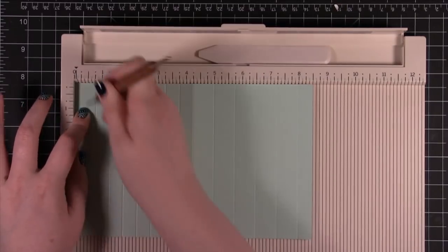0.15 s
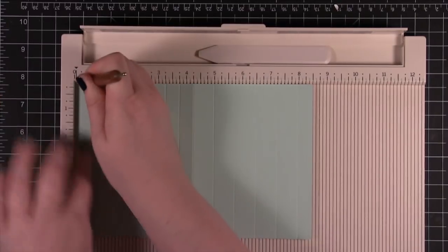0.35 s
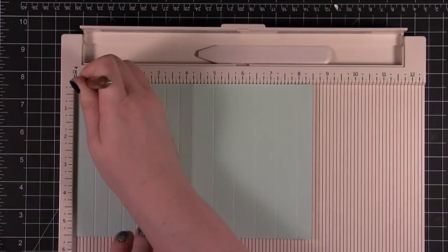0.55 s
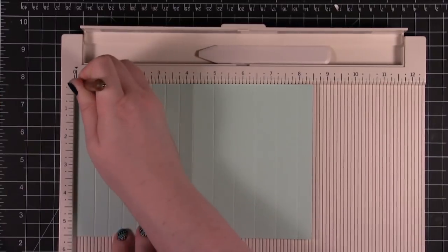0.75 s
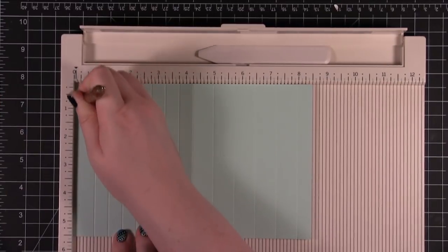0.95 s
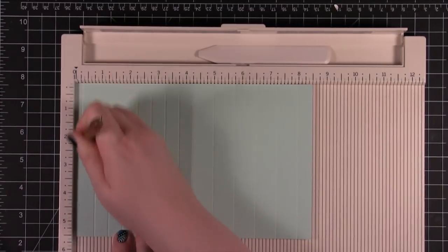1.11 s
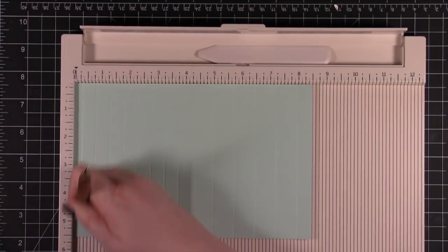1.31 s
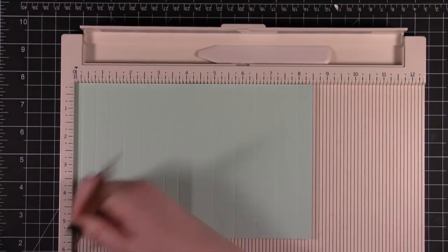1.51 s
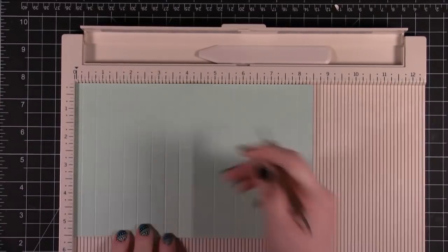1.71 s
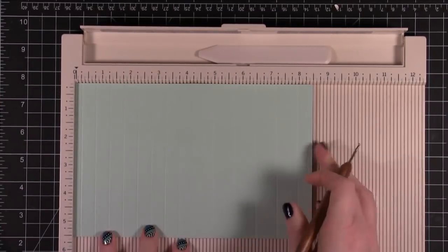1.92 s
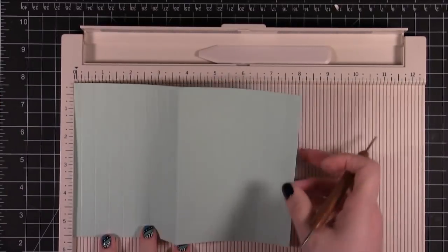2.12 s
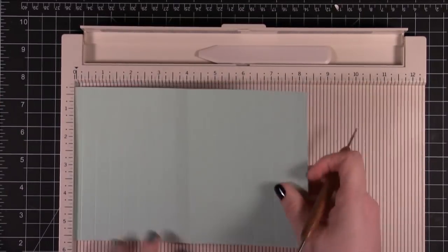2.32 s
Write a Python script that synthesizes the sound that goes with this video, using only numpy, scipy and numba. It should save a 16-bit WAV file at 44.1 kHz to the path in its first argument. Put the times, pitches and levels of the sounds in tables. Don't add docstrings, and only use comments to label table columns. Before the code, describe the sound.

A stylus scrapes a groove in card on a hollow plastic board, ending in a sharp clack

```python
import sys
import numpy as np
from scipy import signal
from scipy.fft import rfft, irfft, next_fast_len
from scipy.io import wavfile
from scipy.ndimage import uniform_filter1d
from numba import njit

SR = 44100
rng = np.random.default_rng(int(sys.argv[2]) if len(sys.argv) > 2 else 0)


def put_to_file(sound):
    columns = np.atleast_2d(sound).T
    safe = np.clip(columns, -1, 1)
    whole_steps = np.round(safe * 32767)
    wavfile.write(sys.argv[1], SR, whole_steps.astype(np.int16))


def attenuation_scalar(level_db):
    decades = np.asarray(level_db, float) / 20
    return 10 ** decades


N = 103811

# pitch_hz, level_db, t60_s
BOARD_MODES = [(239, -8, 0.12), (402, -20, 0.24), (479, 7.5, 0.061), (532, 8, 0.06), (770, 10, 0.047),
               (1013, 6, 0.061), (1267, 7.5, 0.056), (1380, -1, 0.082), (1758, -7, 0.32), (2200, -5, 0.057),
               (2476, -26, 0.054), (3080, -15, 0.04), (3840, -24, 0.035), (4900, -10, .04)]
# pitch_hz, level_db, t60_s
CARD_MODES = [(357, -5, 0.14), (544, 4.5, 0.092), (681, -12, 0.032), (850, -10, 0.087), (990, 9.5, 0.11),
              (1190, 14.5, 0.07), (1290, 19, 0.032), (1438, 12, 0.11), (1685, 7, 0.11), (1988, 13, 0.1),
              (2420, -13, 0.069), (2690, 0, 0.072), (3450, -12, .03)]
BOARD_LOW_HZ, CARD_LOW_HZ = 245, 435


def unit(x):
    return x / np.sqrt(np.mean(x ** 2))


def colour(x, points):
    hz, db = np.array(points, float).T
    n = next_fast_len(N)
    bin_hz = np.arange(n // 2 + 1) * SR / n
    gain = attenuation_scalar(np.interp(np.log(bin_hz + 1), np.log(hz), db))
    return unit(irfft(rfft(x, n) * gain, n)[:N])


def ring(x, modes):
    out = 0
    for hz, db, t60_s in modes:
        pole = np.exp(2j * np.pi * hz / SR - np.log(1000) / (max(t60_s, .002) * SR))
        out = out + attenuation_scalar(db) * signal.lfilter([1], [1, -pole], x).imag
    return out


def cut(x, hz, kind, order=2):
    sos = signal.butter(order, np.clip(hz, 20, .45 * SR), kind, fs=SR, output="sos")
    return signal.sosfilt(sos, x)


def wander(hz):
    return unit(cut(rng.standard_normal(N), hz, "low"))


def grit(rate_hz, spread_db):
    clicks = (rng.random(N) < rate_hz / SR) * attenuation_scalar(spread_db * np.minimum(rng.exponential(size=N), 3))
    flicker = attenuation_scalar(0.5 * wander(60))
    return unit(rng.standard_normal(N) * (1 + 0.5 * clicks) * flicker)


@njit
def sweep(x, hz, sharp):
    y, b, l = np.empty(len(x)), 0., 0.
    for i in range(len(x)):
        g = np.tan(np.pi * hz[i] / SR)
        v = (b + g * (x[i] - l)) / (1 + g * (g + sharp))
        b, l, y[i] = 2 * v - b, l + 2 * g * v, sharp * v
    return y


def pan(x, db):
    return x * attenuation_scalar(np.array([[db], [-db]]) / 2)


def stylus(t):
    # time_s, fibre_hiss_db, board_push_db
    stroke = [
        (.88, -83, -74),
        (1.0, -51.5, -50),
        (1.1, -45.5, -61),
        (1.2, -39.5, -35),
        (1.27, -38.5, -37),
        (1.31, -37.5, -30.5),
        (1.36, -40, -27),
        (1.41, -38.5, -39.5),
        (1.428, -50, -48),
    ]
    # pitch_hz, level_db (per Hz)
    fibre = [(80, -40), (400, -6), (1200, -9.5), (1770, -11), (2560, -12.5), (8440, -13), (14500, -21),
             (16000, -27)]
    # pitch_hz, pass_s, lively_s
    passed = [(124, 1.22, .06), (235, 1.125, .02), (245, 1.21, .03), (240, 1.305, .02), (229, 1.385, .045),
              (360, 1.335, .02), (390, 1.38, .02), (455, 1.235, .04), (475, 1.315, .025), (560, 1.12, .015),
              (570, 1.17, .02), (575, 1.3, .02), (690, 1.29, .02), (770, 1.245, .03), (780, 1.35, .025),
              (880, 1.23, .02), (1020, 1.13, .03), (1010, 1.29, .035), (975, 1.34, .018), (1060, 1.38, .02),
              (1120, 1.32, .015), (1245, 1.15, .03), (1310, 1.27, .025), (1500, 1.23, .025),
              (1740, 1.3, .04)]
    passed_db = [-55, -49.5, -53, -56, -43.5, -44, -44, -43, -34.5, -53, -48.5, -39.5, -43.5, -45, -49, -47,
                 -53, -37.5, -41.5, -62, -43, -53, -49, -49, -47.5]
    pass_t60_s, pass_rest_db, pass_lock, lift_s = 0.15, -23, .85, .006
    s, hiss_db, push_db = np.array(stroke).T
    out = colour(grit(740, 5.0), fibre) * attenuation_scalar(np.interp(t, s, hiss_db))
    push = grit(420, 8.2)
    rest = attenuation_scalar(pass_rest_db + np.interp(t, s, push_db))
    for (hz, pass_s, lively_s), db in zip(passed, passed_db):
        mode = [(hz, 0, pass_t60_s)]
        loose = ring(push, mode)
        locked = cut(ring(loose, mode), hz / 2, "high")
        locked = unit(locked / uniform_filter1d(locked ** 2, size=1200) ** (pass_lock / 2))
        near = np.exp(-((t - pass_s) / lively_s) ** 2)
        out = out + unit(cut(loose, hz / 2, "high")) * rest + locked * attenuation_scalar(db) * near
    return out * (t > s[0]) * np.clip((s[-1] - t) / lift_s, 0, 1)


def hits(rows, modes, low_hz):
    # pitch_hz, level_db (per Hz)
    crack_tone = [(880, 7.5), (1500, 4), (2250, 1.5), (3590, -4), (4870, -5.5), (12100, -18), (16000, -31)]
    crack_t60_s, rattle_db, rattle_t60_s = 0.035, -28, 0.49
    contact_cycles, favour_db_per_oct = 0.52, 11
    spot_db, spot_t60_s = 8, .03
    held_t60_s = .06
    out, n = np.zeros(N), int(.22 * SR)
    t = np.arange(n) / SR
    crack = cut(colour(grit(2000, 1.1), crack_tone), low_hz, "high", order=4)
    fade = attenuation_scalar(-60 * t / crack_t60_s) + attenuation_scalar(rattle_db - 60 * t / rattle_t60_s)
    for s, db, favoured_hz, crack_db in rows:
        push = np.sin(np.pi * np.clip(t * favoured_hz / contact_cycles, 0, 1)) ** 2
        struck = [(favoured_hz, spot_db, spot_t60_s)]
        for hz, mode_db, t60_s in modes:
            luck = rng.standard_normal()
            off_db = favour_db_per_oct * abs(np.log2(hz / favoured_hz))
            struck.append((hz * (1 + luck / 100), mode_db + luck - off_db, min(t60_s, held_t60_s)))
        body = cut(ring(push, struck), low_hz, "high", order=4)
        body = body / np.abs(body).max()
        i = int(s * SR)
        k = min(n, N - i)
        out[i:i + k] += attenuation_scalar(db) * (body[:k] + attenuation_scalar(crack_db) * crack[i:i + k] * fade[:k])
    return out


def knocks():
    # start_s, level_db, favoured_hz, crack_db
    board_knocks = [(.2245, -30, 507, -43), (.2545, -36.5, 1210, 3.5), (.258, -32, 543, -45),
                    (.397, -44, 730, -5), (.4165, -33.5, 500, -45), (.43, -36, 440, -40),
                    (.445, -44, 386, -40), (.275, -46, 480, -40), (.305, -40.5, 490, -40),
                    (1.4241, -11.5, 770, -2.5), (1.4262, -9.5, 520, -7), (1.4305, -23, 750, 3.5),
                    (1.437, -43, 480, -16), (1.444, -23.5, 800, -6.5), (1.451, -25, 380, -20),
                    (1.459, -27, 480, -13), (1.466, -28.5, 750, -30), (1.476, -30, 450, -26),
                    (1.488, -28, 544, -28), (1.516, -38, 613, -19), (1.528, -43, 520, -22),
                    (1.677, -32.5, 1014, -47), (1.684, -37, 560, -40), (1.936, -45, 460, -24)]
    return hits(board_knocks, BOARD_MODES, BOARD_LOW_HZ)


def snaps():
    # start_s, level_db, favoured_hz, crack_db
    card_snaps = [(2.127, -49, 860, -30), (2.135, -31, 1500, -30), (2.15, -28, 1470, -33),
                  (2.151, -51, 536, -40), (2.16, -29, 1320, -20), (2.184, -27, 1370, -25),
                  (2.192, -28.5, 1210, -34), (2.197, -26, 980, -35), (2.203, -40, 1050, -35),
                  (2.222, -39, 1240, -30), (2.257, -24.5, 1510, -17), (2.2752, -16, 700, -19),
                  (2.279, -14.5, 776, -10), (2.2812, -4.5, 1290, -39), (2.2845, -6.5, 860, -38),
                  (2.2865, -20, 1860, -15), (2.289, -10.5, 1190, -23), (2.293, -12, 714, -35),
                  (2.2945, -17, 1300, -32), (2.2995, -32, 1110, -7), (2.304, -17, 900, -19),
                  (2.3095, -21, 1230, -14), (2.318, -32, 850, -22), (2.3222, -22.5, 1510, 0.5),
                  (2.3238, -13.5, 1240, -21), (2.328, -19, 1380, -14.5), (2.3395, -23.5, 1140, -11),
                  (2.347, -23, 1620, -13)]
    return hits(card_snaps, CARD_MODES, CARD_LOW_HZ)


def scrapes(t):
    # loudest_s, length_s, level_db,
    # early_edge_hz, late_edge_hz
    edge_scrapes = [(1.446, 0.0068, -31.5, 4500, 4870), (1.461, 0.0056, -35.5, 4900, 4200),
                    (1.482, 0.011, -44, 4200, 4000), (2.151, 0.002, -42, 3450, 3300),
                    (2.222, 0.0033, -52, 2670, 2770), (2.002, 0.016, -54, 540, 536),
                    (2.01, 0.025, -50, 1470, 2220), (2.031, 0.015, -47, 520, 560),
                    (2.038, 0.012, -43.5, 4030, 5660), (2.062, 0.051, -49, 2250, 1810),
                    (2.114, .015, -44, 5100, 6530), (2.132, 0.023, -48, 8600, 6300),
                    (2.136, 0.02, -46, 3250, 3450), (2.163, 0.0055, -38.5, 2970, 2530),
                    (2.155, 0.011, -53.5, 535, 544), (2.2, 0.016, -47, 1790, 1650),
                    (2.193, 0.015, -48, 1400, 1080), (2.214, 0.0065, -49, 1040, 1250),
                    (2.26, 0.012, -47.5, 7900, 7200), (2.263, 0.015, -44, 2760, 2530),
                    (2.339, 0.022, -44, 2740, 2840)]
    width, broad_db, card_db = 0.32, -2.5, -6
    out, rub = 0, grit(780, 5.7)
    damped = [(hz, db, t60_s * 0.43) for hz, db, t60_s in CARD_MODES]
    stir = unit(cut(ring(rub, damped), CARD_LOW_HZ, "high"))
    for k, (s, length_s, db, early_hz, late_hz) in enumerate(edge_scrapes):
        shift = k * N // len(edge_scrapes)
        x, card = np.roll(rub, shift), np.roll(stir, shift)
        env = np.exp(-((t - s) / length_s) ** 2 / 2)
        glide_hz = np.interp(t, [s - length_s, s + length_s], [early_hz, late_hz])
        edge = unit(sweep(sweep(x, glide_hz, width), glide_hz, width))
        broad = unit(cut(x, [late_hz / 2, 2 * late_hz], "band", order=1))
        out = out + attenuation_scalar(db) * env * (edge + attenuation_scalar(broad_db) * broad + attenuation_scalar(card_db) * card)
    return out


def fingers(t):
    # start_s, length_s, level_db, lowest_hiss_hz
    slides = [
        (-.05, 0.07, -42, 850),
        (-.05, 0.33, -43, 2900),
        (.24, 0.087, -52, 3910),
        (.08, .14, -43, 3070),
        (0.328, 0.089, -44.5, 4360),
        (0.481, 0.082, -46.5, 5600),
        (1.432, 0.0097, -52, 3840),
        (1.567, 0.0088, -56.5, 1500),
        (1.785, 0.11, -56.5, 2870),
        (1.873, 0.075, -65, 4950),
    ]
    attack_s, release_s, skin_top_hz = 0.0053, 0.034, 10700
    body_db, skin_peak_db = -14.5, -20
    damped = [(hz, db, t60_s * 0.8) for hz, db, t60_s in BOARD_MODES]
    board = unit(cut(ring(rng.standard_normal(N), damped), BOARD_LOW_HZ, "high"))
    rub = cut(grit(830, 2), skin_top_hz, "low", order=1) * attenuation_scalar(0.8 * wander(27))
    out = 0
    for k, (s, length_s, db, hz) in enumerate(slides):
        attack = np.clip((t - s) / attack_s, 0, 1)
        release = np.exp(-(np.maximum(t - s - length_s, 0) / release_s) ** 2)
        skin = unit(cut(np.roll(rub, k * N // len(slides)), hz, "high", order=3))
        skin = skin + attenuation_scalar(skin_peak_db) * unit(cut(skin, [hz, hz * 1.21], "band"))
        out = out + attenuation_scalar(db) * attack * release * (skin + attenuation_scalar(body_db) * board)
    return out


def ticks():
    # start_s, level_db, pitch_hz, t60_s
    contacts = [(0.698, -48, 5030, 0.011), (1.4234, -25, 12700, 0.011), (1.425, -10.5, 3900, 0.01),
                (1.688, -42, 6010, 0.017), (1.689, -42, 9740, 0.015), (1.7946, -26.5, 3150, 0.0023),
                (1.7946, -29.5, 5200, 0.0037), (1.7948, -42, 12600, .008), (1.801, -35, 7400, 0.0045),
                (1.8012, -32, 9350, 0.0029), (2.027, -36, 5000, 0.016), (2.038, -29, 5830, 0.011),
                (2.039, -27.5, 2190, 0.0085), (2.043, -29, 1010, 0.017), (0.2537, -48, 2530, .02),
                (1.4265, -29, 230, 0.14), (1.416, -32, 1900, 0.025), (2.278, -49.5, 125, 0.14),
                (2.282, -60, 244, 0.046), (2.289, -29, 2680, .012), (2.296, -33, 2530, 0.015)]
    out, n = np.zeros(N + SR), int(.07 * SR)
    impulse = np.arange(n) == 0
    fade = np.linspace(1, 0, n) ** .5
    for s, db, hz, t60_s in contacts:
        i = int(s * SR)
        out[i:i + n] += cut(ring(impulse, [(hz, db, t60_s)]), hz / 2, "high") * fade
    return out[:N]


def room(x):
    level_db, gap_s, split_hz = -9, 0.00359, 5600
    low_t60_s, high_t60_s, low_alike = 0.28, 0.096, 0.4
    t = np.arange(int(.5 * SR)) / SR
    noise = rng.standard_normal((2, len(t))) * (t > gap_s)
    low = cut(noise, split_hz, "low", order=1)
    high = cut(noise, split_hz, "high", order=1)
    bass = cut(noise, 1300, "low", order=1)
    low = low + low_alike * (bass.mean(0) * np.sqrt(2) - bass)
    tail = low * attenuation_scalar(-60 * t / low_t60_s) + high * attenuation_scalar(-60 * t / high_t60_s)
    tail = tail / np.sqrt((tail ** 2).sum(1, keepdims=True))
    return attenuation_scalar(level_db) * signal.fftconvolve(x[None], tail, axes=1)[:, :N]


def air(t):
    # pitch_hz, level_db (per Hz)
    fan = [(15, -34), (25, -8.5), (451, 0), (911, -6), (1130, -6), (1890, -9), (2110, -10), (3080, -12),
           (16000, -24)]
    fan_db, hum_db, desk_db, hum_hz = -53, -63, -68, 120
    mid = colour(rng.standard_normal(N), fan)
    side = colour(rng.standard_normal(N), fan) * np.array([[1], [-1]])
    drift = attenuation_scalar(0.64 * wander(36))
    hum = attenuation_scalar(hum_db) * np.sin(2 * np.pi * hum_hz * t) * drift
    desk = unit(cut(rng.standard_normal(N), [hum_hz - 12, hum_hz + 12], "band", order=1))
    return pan(attenuation_scalar(fan_db) * drift * (mid + 0.7 * side) + hum + attenuation_scalar(desk_db) * desk, -1.5)


def scene():
    t = np.arange(N) / SR
    board = stylus(t) + knocks()
    card = scrapes(t) + snaps()
    hand = fingers(t) + ticks()
    direct = pan(board, -3) + pan(hand, -1.4) + pan(card, -1.5)
    return direct + room(board + hand + card) + air(t)


def band_limit(x):
    return signal.sosfilt(signal.butter(12, 16490, fs=SR, output="sos"), x)


def record(dry):
    top_cut = signal.ellip(12, .5, 100, 15800, fs=SR, output="sos")
    mix = signal.sosfilt(top_cut, cut(dry, 25, "high"))
    return band_limit(mix)


dry = scene()
out = record(dry)
put_to_file(out)
```